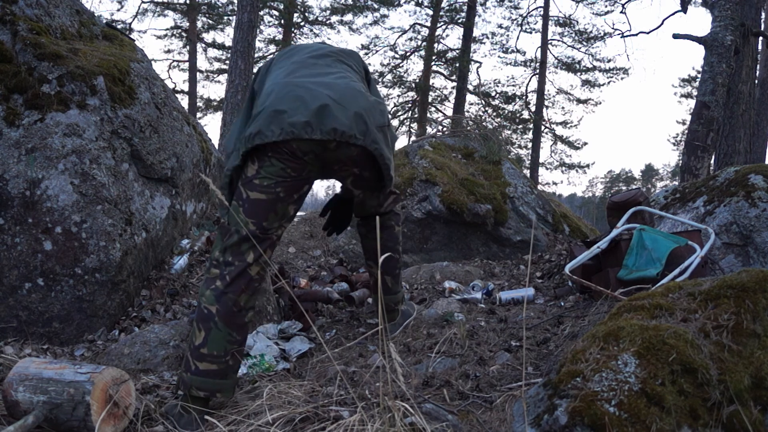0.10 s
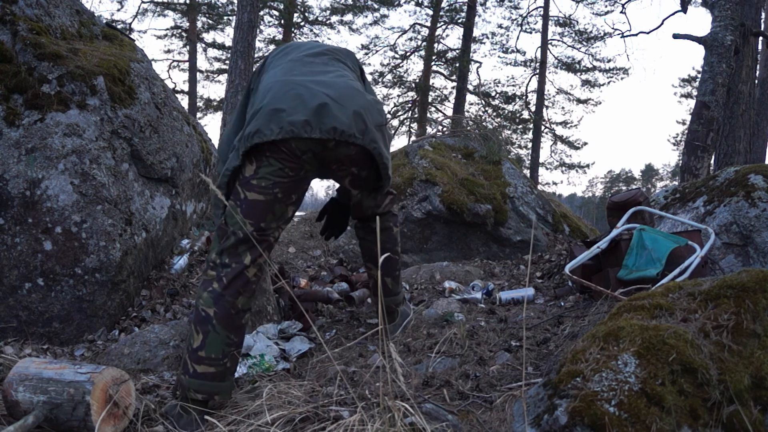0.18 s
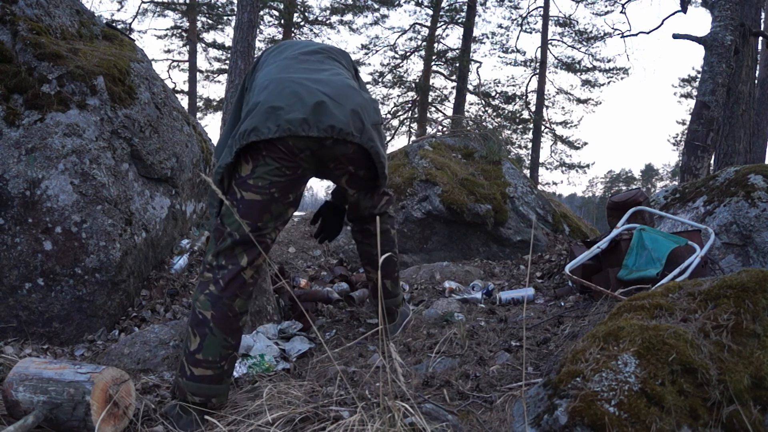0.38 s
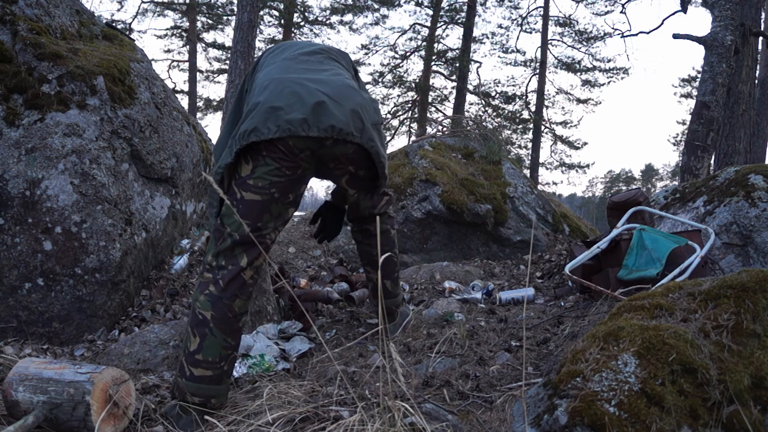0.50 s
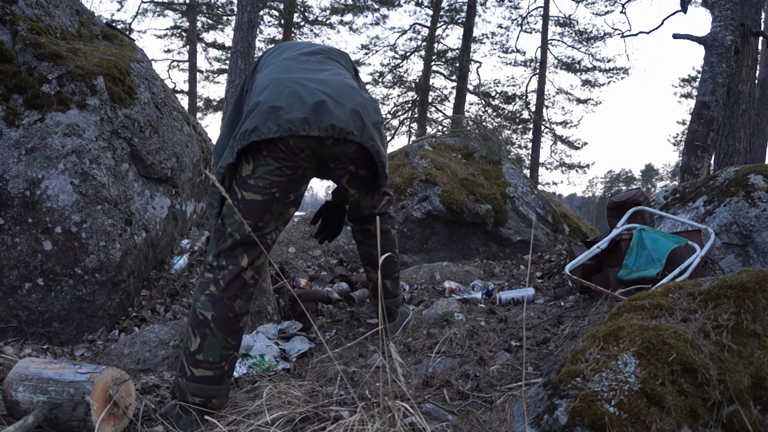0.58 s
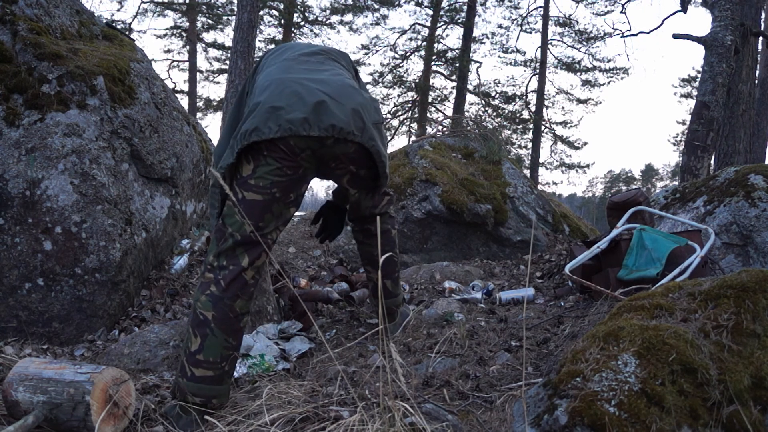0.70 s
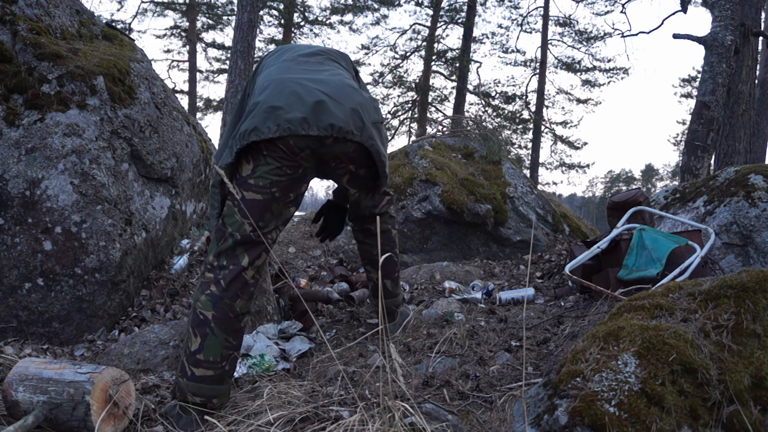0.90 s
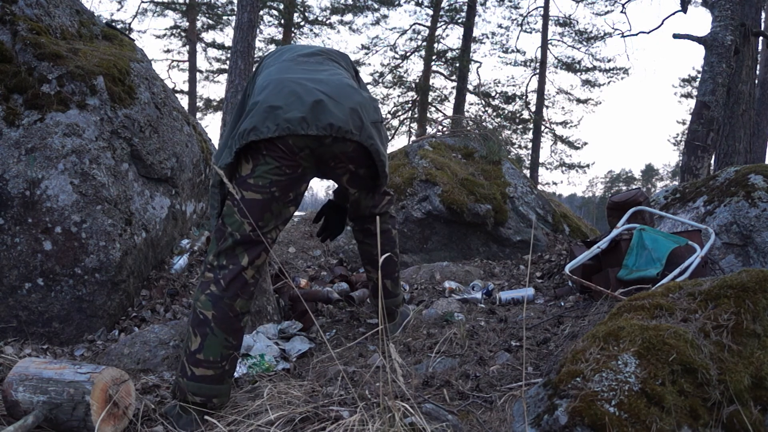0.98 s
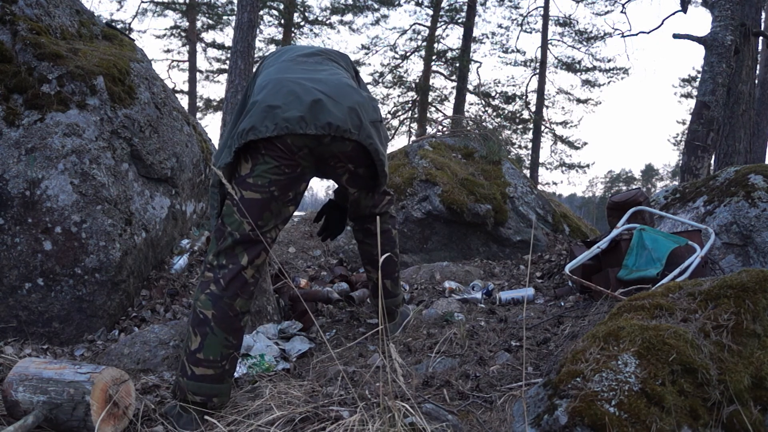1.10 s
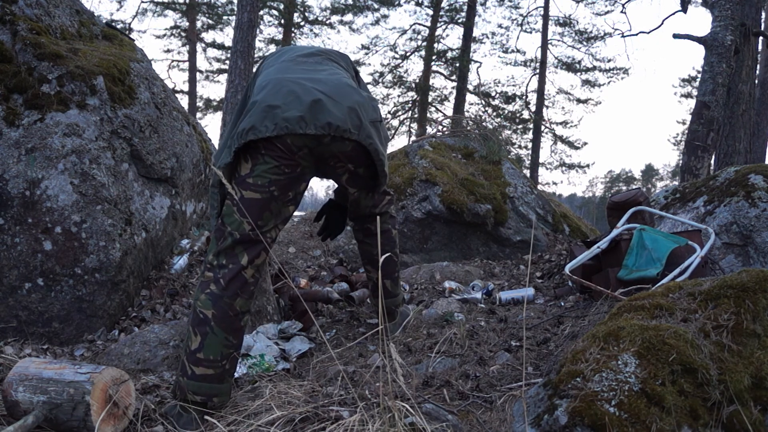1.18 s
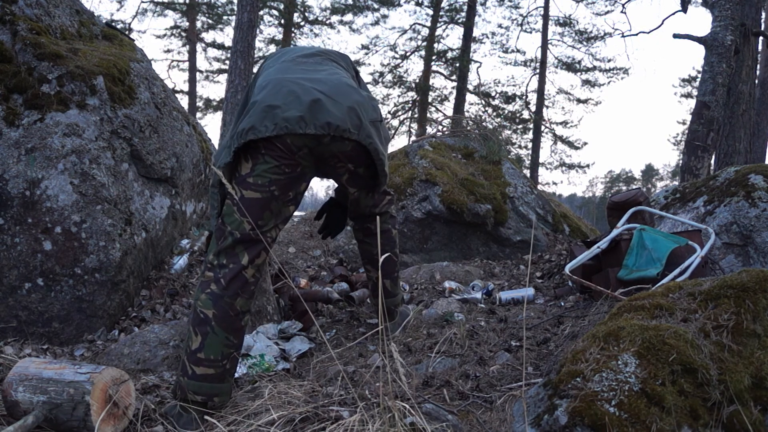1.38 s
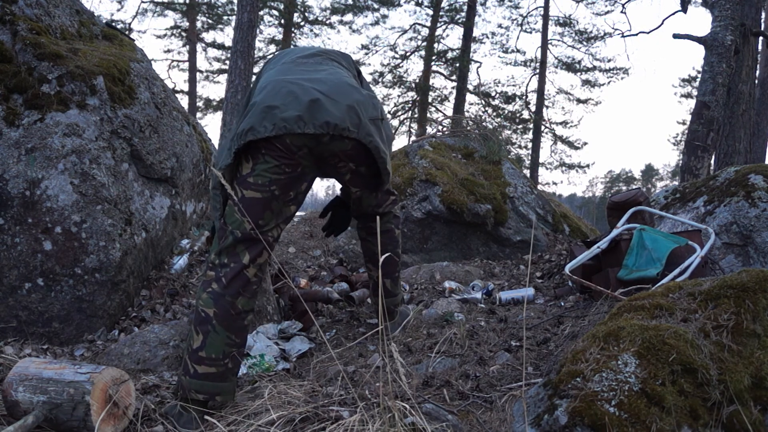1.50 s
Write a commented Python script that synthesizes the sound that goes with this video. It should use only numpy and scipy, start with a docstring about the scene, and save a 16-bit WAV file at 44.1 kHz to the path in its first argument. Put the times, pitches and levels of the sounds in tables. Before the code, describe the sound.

Thin hollow cans knock together in a quick rattling burst outdoors, with faint bird chirps

```python
"""Leaf rustle and a bird note come first, over a faint steady wash (all shaped noise but the gliding
bird tones); then empty thin-walled drink cans knock and tumble on a forest floor a few metres away.
Knocks start decaying shell modes plus a hollow boom; random touches on the same modes make the rattle.
Leaf and twig ticks are short noise bursts; cans and birds get scattered echoes."""
import sys
import numpy as np
from scipy import signal
from scipy.fft import rfft, irfft
from scipy.io import wavfile

SR = 44100
rng = np.random.default_rng(int(sys.argv[2]) if len(sys.argv) > 2 else 0)


def wav_record(signal):
    """Record a signal, one row per channel, as 16-bit PCM in the file named by sys.argv[1]."""
    frames = np.transpose(np.atleast_2d(signal))
    bounded = np.clip(frames, -1, 1)
    # unit amplitude maps onto the largest positive 16-bit level
    quanta = np.round(bounded * 32767).astype(np.int16)
    wavfile.write(sys.argv[1], SR, quanta)


N = 68355  # samples

# Wash spectrum, relative: [f/Hz, density/dB]
WASH_SPECTRUM = [(18, -81), (30, -51), (332, -13.5), (369, -9), (420, -12), (561, -2.5), (1080, -9.5),
                 (1330, -9), (4660, -14.5), (6890, -18), (15500, -25.5)]
WASH_RMS_DB = -50.5
# Left-right likeness of the noise layers: [f/Hz, correlation/1]
LIKENESS_BY_HZ = [(60, 0.41), (130, 0.21), (290, 0.23), (640, 0.84), (1410, 0.05), (3100, 0.26),
                  (6820, -0.15), (15000, 0.17)]

# Rustle envelope before trim: [t/s, level/dB]
RUSTLE_LEVEL = [(0.0, -45), (0.098, -45.5), (0.25, -52.5), (0.846, -61), (1.062, -66.5), (1.55, -62.5)]
# Rustle spectrum, relative: [f/Hz, density/dB]
LEAF_SPECTRUM = [(180, -69), (300, -21), (835, -11.5), (1020, -6), (2610, -10.5), (2880, -7), (3450, -13.5),
                 (10300, -16), (15500, -23.5)]
# Snaps of twigs and leaves: [t/s, burst gain/dB]
SNAPS = [(0.0386, -31.5), (0.048, -39), (0.06, -35), (0.07, -36), (0.1794, -43), (0.768, -34.5),
         (0.779, -44), (1.0783, -37.5), (1.5444, -39)]
LEAF_TRIM_DB, GRAINS_PER_S = 6, 1300
TICK_HZ, TICK_DECAY_S = 7900, 0.0031

# Bird notes: [t/s, length/s, start f/Hz, end f/Hz, level/dB, roughness/1 (clipped to 0-1),
# left minus right/dB]
BIRD_NOTES = [(-.02, 0.067, 2934, 2900, -35.5, 0.2, -2), (0.103, 0.043, 2150, 2165, -43, 0.03, -1),
              (0.937, 0.024, 2278, 3090, -40, 0.47, 4), (0.947, 0.013, 3622, 4329, -44.5, 0.5, 7),
              (0.965, 0.028, 3900, 2477, -39.5, 0.77, 3.5), (0.99, 0.02, 2690, 2280, -41, 0.5, -1),
              (1.195, 0.0613, 7080, 7620, -61.5, .95, 7), (1.238, 0.042, 6850, 6820, -58, 0.33, 6),
              (1.257, 0.0255, 5600, 6116, -60, 1.11, 2), (1.294, 0.0634, 7220, 7210, -66, .95, -4),
              (1.369, 0.048, 5780, 5739, -53, 0.25, -9), (1.375, 0.062, 6700, 6490, -57, .3, 8),
              (1.424, 0.039, 6077, 5390, -50, 0.55, 5.5), (1.465, 0.053, 5785, 5900, -55.5, .4, -1)]
NOTE_EDGE_S, FLUTTER_HZ = 0.0038, 353

# Clear shell modes: [f/Hz, level/dB, t60/s before grip damping]
CAN_MODES = [(547.7, -19, 0.335), (668.2, -6, 0.1646), (725, -7.5, 0.12), (847, -19, 0.43),
             (926.5, -9, 0.36), (989, -13.5, 0.094), (1052, -5, 0.04), (1080, -12.5, 0.06),
             (1147, -3, 0.12), (1238, -8.5, 0.11), (1302, -11, 0.22), (1454, -12.5, 0.1), (1637, -9, 0.13),
             (1770, -19, 0.213), (2102, -14.5, 0.126), (2196, -17, .25), (2316, -14.5, 0.1),
             (2507, -14, 0.086), (2687, -38, 0.175)]
# Crowded upper modes, strength: [f/Hz, level/dB]
CROWD_LEVEL = [(500, -27.5), (1000, -17.5), (1500, -24.5), (2600, -24), (4300, -30), (6000, -37.5),
               (9000, -45.5), (15500, -56)]
# Crowded upper modes, decay: [f/Hz, t60/s before grip damping]
CROWD_DECAY = [(500, 0.19), (1400, 0.21), (4000, 0.15), (15500, 0.105)]
FAVOUR_DB, FAVOUR_WIDTH_OCT = 9, 0.18  # lift near the favoured pitch
SPOT_DB = 4  # random spread of mode strength
CONTACT_RISE_S = 0.001
HOLLOW_HZ, HOLLOW_T60_S, HOLLOW_TRIM_DB = 222.3, 0.16, 0.5  # air inside the can
APART_HZ, LEFT_TREBLE_DB = 3550, 2  # ears get differing mode phase and level towards the treble
RIGHT_LAG_S, RADIATES_ABOVE_HZ = 0.000045, 388

# Rattle of jostling cans, envelope before trim: [t/s, level/dB]
RATTLE_LEVEL = [(0.2, -38), (0.254, -45), (0.378, -35), (0.418, -23.5), (0.57, -24.5), (0.708, -37),
                (0.818, -38.5), (0.9, -49)]
RATTLE_SPOTS, RATTLE_PER_S, RATTLE_TRIM_DB = 8, 400, -9
RATTLE_GRIP_T60_S, RATTLE_TILT_DB_PER_OCT, RATTLE_BOOM_DB = 0.18, 1.5, -23.5

# Knocks: [t/s, level before trim/dB, tilt above 1 kHz/(dB/octave), favoured f/Hz,
# t60 of grip or ground/s, hollow boom before its trim/dB re knock level, boom f/Hz]
KNOCK_EVENTS = [(0.097, -27, 3.5, 1400, 0.66, -45, 244), (0.181, -38.5, 8, 1170, 0.54, -16, 216),
                (0.206, -6.5, 0, 1020, 0.34, -42, 257), (0.209, -8, 3, 925, 0.68, -47, 255),
                (0.218, -2, -4.5, 1205, 0.64, -48, 253), (0.225, -2, 3.5, 1015, 0.73, -48, 254),
                (0.236, -8, 3, 1140, 0.37, -58, 253), (0.25, -13.5, 4, 1230, 0.52, -52, 205),
                (0.264, -17.5, 2, 1020, 0.47, -35, 198), (0.276, -20, 4.5, 861, 0.81, -35, 261),
                (0.3, -18.5, 3, 890, 0.72, -29, 259), (0.325, -15, -1.5, 857, 0.53, -46, 210),
                (0.344, -18.5, -2, 850, 1, -28, 252), (0.382, -19, -2.5, 665, 0.78, -22, 246),
                (0.404, -17, 4, 1295, 0.45, -34, 215), (0.412, -6.5, -2.5, 820, 0.55, -43, 253),
                (0.42, -8, -0.5, 800, 0.32, -34.5, 252), (0.44, -30, 8, 1240, 0.5, -38, 215),
                (0.451, -13.5, 0.5, 1075, 0.55, -38, 220), (0.473, -12, -10.5, 910, 0.5, -37, 247),
                (0.485, -16.5, -6, 954, 0.97, -35, 250), (0.528, -11.5, -2.5, 910, 1, -34, 242),
                (0.562, -23, -1.5, 1070, 0.53, -25, 218), (0.574, -18.5, -8, 910, 0.65, -19.5, 214),
                (0.601, -19, -2, 1080, 0.42, -17, 257), (0.61, -30, 3.5, 1030, 0.38, -29, 246),
                (0.689, -3.5, 1, 984, 0.35, -41.5, 259), (0.704, -7, 0, 960, 0.6, -48, 196),
                (0.72, -14.5, -0.5, 1160, 0.49, -55, 194), (0.737, -20, -0.5, 1020, 0.24, -40, 204),
                (0.758, -25.5, 4.5, 877, 0.6, -34, 245), (0.786, -39.5, 9, 958, 0.6, -35, 210),
                (0.835, -38, 3, 1082, 0.71, -22, 238), (0.873, -38.5, -2, 1089, 0.67, -20, 248),
                (1.062, -41, 6.5, 1140, 1, -37, 250)]
KNOCK_TRIM_DB = -11  # shell modes only; the boom cancels it

NEAR_ECHO_DB, NEAR_T60_S = -20.5, 0.47  # cans
FAR_ECHO_DB, FAR_T60_S = -4, 0.37  # birds
ECHO_CUT_HZ, ECHO_APART_HZ = 7400, 1800
STOPBAND_HZ = 16000


def amp(db):
    """dB to linear gain."""
    return 10 ** (np.asarray(db) / 20)


def unit(x):
    """Scale to rms 1."""
    return x / np.sqrt(np.mean(x ** 2) + 1e-20)


def curve(rows):
    """Straight lines in time through (t/s, value) rows, per sample."""
    return np.interp(np.arange(N) / SR, *np.transpose(rows))


def at_hz(points, hz):
    """Interpolate (f/Hz, value) points along log frequency."""
    points_hz, values = np.array(points).T
    return np.interp(np.log(hz), np.log(points_hz), values)


def add(out, start_s, sound):
    """Mix a sound in at start_s, trimmed to the ends of out."""
    i = int(start_s * SR)
    sound = sound[..., max(-i, 0):N - i]
    first = max(i, 0)
    out[..., first:first + sound.shape[-1]] += sound


def colour(pair, spectrum):
    """Shape two noises as mid and side for a spectrum and left-right likeness; rms 1."""
    hz = np.maximum(np.arange(N // 2 + 1) * SR / N, 1)
    alike = np.clip(at_hz(LIKENESS_BY_HZ, hz), -1, 1)
    mid, side = rfft(pair) * amp(at_hz(spectrum, hz)) * np.sqrt([1 + alike, 1 - alike])
    return unit(irfft(np.array([mid + side, mid - side]), N))


def clicks(per_s, spread_db, shape):
    """Random impulses of uneven size and either sign."""
    size_db = spread_db * np.minimum(rng.exponential(1, shape), 4)
    signed = amp(size_db) * rng.choice([-1, 1], shape)
    return signed * (rng.random(shape) < per_s / SR)


def echoes(x, db, t60_s):
    """Dull scattered returns from rocks and trunks, alike on both sides only in the bass."""
    t = np.arange(SR // 2) / SR
    decay = amp(-60 * t / t60_s) * (t > 0.004)
    mid, side = rng.standard_normal((2, len(t))) * decay
    side = signal.lfilter(*signal.butter(2, ECHO_APART_HZ, "high", fs=SR), side)
    tail = signal.lfilter(*signal.butter(1, ECHO_CUT_HZ, fs=SR), [mid + side, mid - side])
    tail = tail / np.sqrt(np.sum(tail ** 2) / 2)
    return amp(db) * signal.fftconvolve(x, tail, axes=1)[:, :N]


def wash():
    """Steady Gaussian noise under a fixed spectrum."""
    return amp(WASH_RMS_DB) * colour(rng.standard_normal((2, N)), WASH_SPECTRUM)


def leaf_rustle():
    """Many small impulses over softer noise, coloured and following the rustle envelope."""
    grain = clicks(GRAINS_PER_S, 4.8, (2, N)) + 0.5 * rng.standard_normal((2, N))
    return amp(curve(RUSTLE_LEVEL) + LEAF_TRIM_DB) * colour(grain, LEAF_SPECTRUM)


def leaf_ticks():
    """Each snap is a band-limited noise burst with exponential decay."""
    out = np.zeros((2, N))
    t = np.arange(SR // 50) / SR
    band = signal.butter(1, [TICK_HZ * 0.18, TICK_HZ * 1.62], "band", fs=SR, output="sos")
    puffs = signal.sosfilt(band, rng.standard_normal((len(SNAPS), 2, len(t))))
    for (start_s, db), puff in zip(SNAPS, puffs):
        add(out, start_s, amp(db) * puff * np.exp(-t / TICK_DECAY_S))
    return out


def birds():
    """Linear pitch glides; fast random complex flutter smears the rough notes."""
    out = np.zeros((2, N))
    lowpass = signal.butter(2, FLUTTER_HZ, fs=SR, output="sos")
    flutter = unit(signal.sosfilt(lowpass, rng.standard_normal((len(BIRD_NOTES), 2, SR // 8))))
    flutter = flutter[..., SR // 100:]  # skip filter onset
    for note, (real, imag) in zip(BIRD_NOTES, flutter):
        start_s, length_s, hz0, hz1, db, rough, pan_db = note
        t = np.arange(int(length_s * SR)) / SR
        rough = np.clip(rough, 0, 1)
        shake = 1 - rough + rough * (real + 1j * imag)[:len(t)]
        edge = np.clip(np.minimum(t, length_s - t) / NOTE_EDGE_S, 0, 1)
        cycles = hz0 * t + (hz1 - hz0) * t ** 2 / length_s / 2
        tone = (shake * np.exp(2j * np.pi * cycles)).imag * edge
        add(out, start_s, tone * amp([[db + pan_db / 2], [db - pan_db / 2]]))
    return out


def shell():
    """Build clear low modes and a dense upper crowd; return a maker of single stereo blows."""
    crowd_hz = 500 + 15000 * np.sort(rng.random(size=420)) ** 1.6
    crowd = np.transpose([crowd_hz, at_hz(CROWD_LEVEL, crowd_hz), at_hz(CROWD_DECAY, crowd_hz)])
    hz, mode_db, t60_s = np.vstack([CAN_MODES, crowd]).T
    t = np.arange(SR // 5) / SR
    rings = amp(-60 * np.outer(1 / t60_s, t)) * np.exp(2j * np.pi * np.outer(hz, t))
    swell = amp(-60 * t / HOLLOW_T60_S) * (1 - np.exp(-t / 0.004))
    apart = hz ** 2 / (hz ** 2 + APART_HZ ** 2)
    ear_db = np.outer([0.5, -0.5], LEFT_TREBLE_DB * apart)
    lag_rad = np.outer([0, 1], 2 * np.pi * hz * RIGHT_LAG_S)
    radiation = signal.butter(2, RADIATES_ABOVE_HZ, "high", fs=SR)

    def blow(tilt_db_per_oct, best_hz, grip_t60_s, boom_db, boom_hz):
        """Start all modes at random strength and phase, damp them by the grip, add the boom."""
        spot, phase, left, right = rng.standard_normal((4, len(hz)))
        tilt_db = tilt_db_per_oct * np.log2(np.maximum(hz / 1000, 1))
        favour_db = FAVOUR_DB * np.exp(-(np.log2(hz / best_hz) / FAVOUR_WIDTH_OCT) ** 2)
        level_db = mode_db + tilt_db + SPOT_DB * spot + favour_db
        phase_rad = 1.42 * phase + apart * np.array([left, right]) - lag_rad
        start = amp(level_db + ear_db) * np.exp(1j * phase_rad)
        envelope = (1 - np.exp(-t / CONTACT_RISE_S)) * amp(-60 * t / max(grip_t60_s, 0.03))
        boom_gain = amp(boom_db + HOLLOW_TRIM_DB - KNOCK_TRIM_DB)
        boom = boom_gain * swell * np.sin(2 * np.pi * boom_hz * t)
        return signal.lfilter(*radiation, (start @ rings).imag * envelope) + boom
    return blow


def rattle(blow):
    """Small uneven touches at several spots ring the same modes, more damped."""
    touches = clicks(RATTLE_PER_S / RATTLE_SPOTS, 3.0, (RATTLE_SPOTS, 1, N))
    out = np.zeros((2, N))
    for spot_touches in touches:
        best_hz = rng.uniform(510, 1056)
        ring = blow(RATTLE_TILT_DB_PER_OCT, best_hz, RATTLE_GRIP_T60_S, RATTLE_BOOM_DB, HOLLOW_HZ)
        out += signal.fftconvolve(spot_touches, ring, axes=1)[:, :N]
    t = np.arange(N) / SR
    begun = t > RATTLE_LEVEL[0][0]
    fade = np.clip((RATTLE_LEVEL[-1][0] - t) * 20, 0, 1)  # last 50 ms
    return unit(out) * amp(curve(RATTLE_LEVEL) + RATTLE_TRIM_DB) * begun * fade


def knocks(blow):
    """Each knock starts every mode with its own strength."""
    out = np.zeros((2, N))
    for start_s, level_db, *how in KNOCK_EVENTS:
        add(out, start_s, amp(level_db + KNOCK_TRIM_DB) * blow(*how))
    return out


def scene():
    """Sum the wash, leaves, birds and cans, with echoes of the last two."""
    blow = shell()
    cans = knocks(blow) + rattle(blow)
    song = birds()
    background = wash() + leaf_rustle() + leaf_ticks()
    song_echo = echoes(song, FAR_ECHO_DB, FAR_T60_S)
    can_echo = echoes(cans, NEAR_ECHO_DB, NEAR_T60_S)
    return background + song + song_echo + cans + can_echo


def record(dry):
    """Round the peaks by tanh, then cut the top steeply."""
    rounded = 1.3 * np.tanh(dry / 1.3)
    return signal.sosfilt(signal.cheby2(20, 80, STOPBAND_HZ, fs=SR, output="sos"), rounded)


dry = scene()
out = record(dry)
wav_record(out)
```